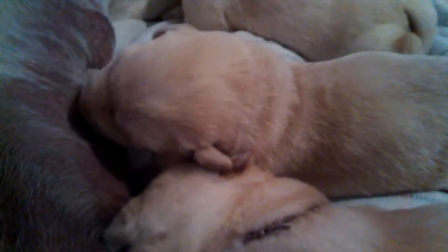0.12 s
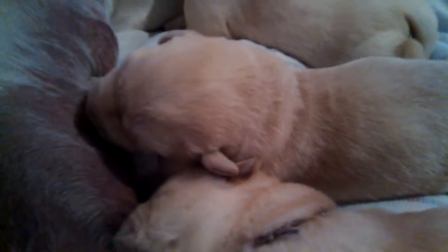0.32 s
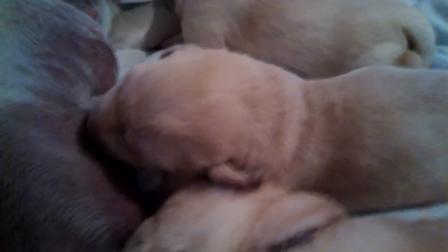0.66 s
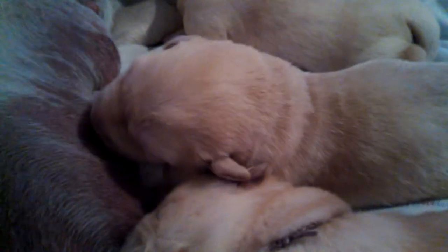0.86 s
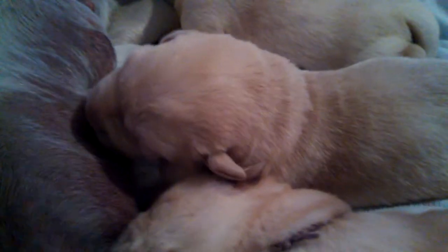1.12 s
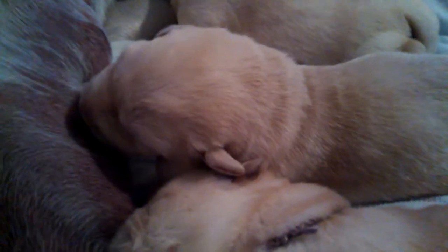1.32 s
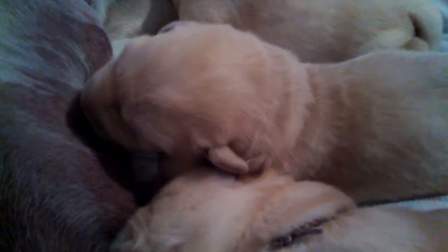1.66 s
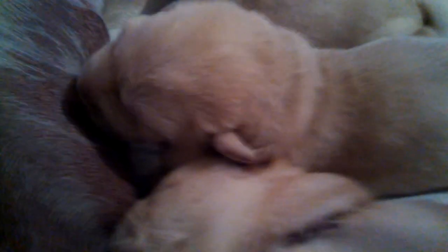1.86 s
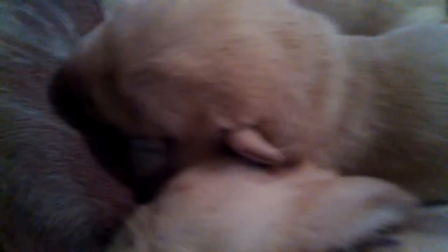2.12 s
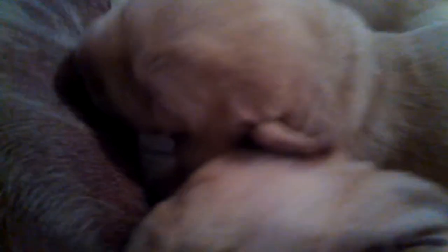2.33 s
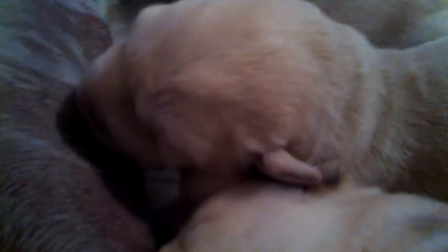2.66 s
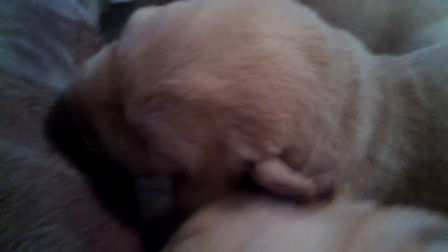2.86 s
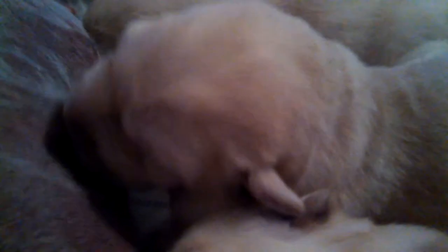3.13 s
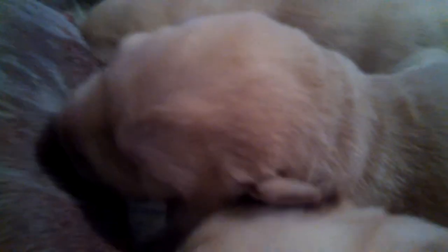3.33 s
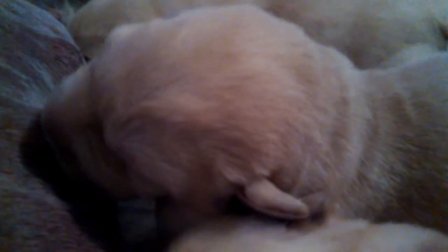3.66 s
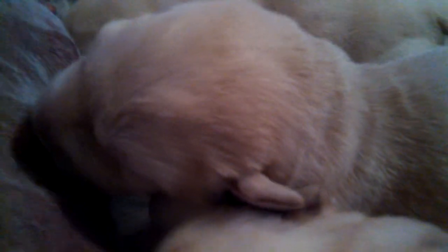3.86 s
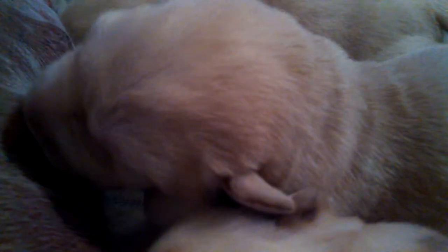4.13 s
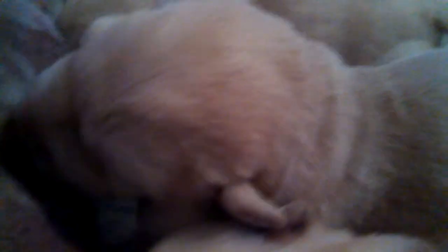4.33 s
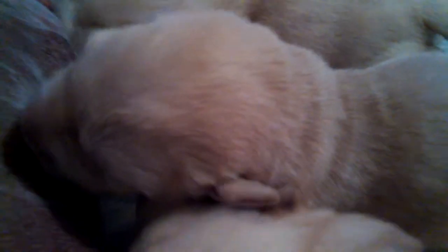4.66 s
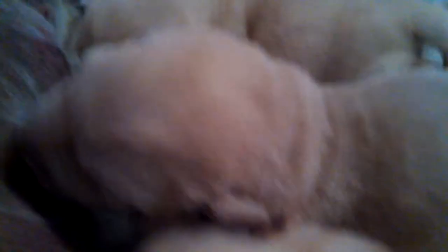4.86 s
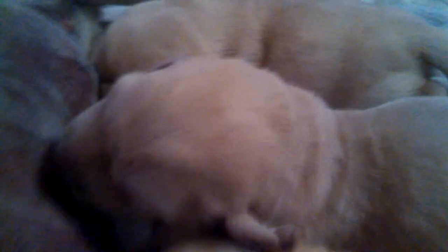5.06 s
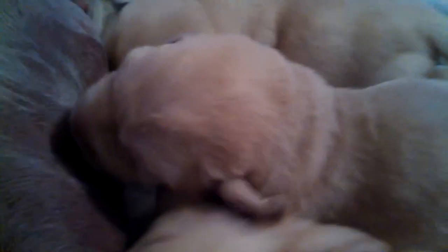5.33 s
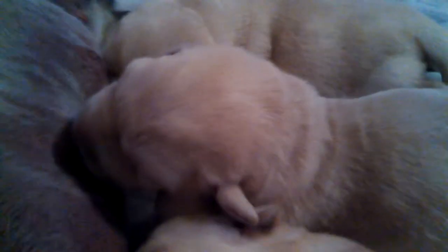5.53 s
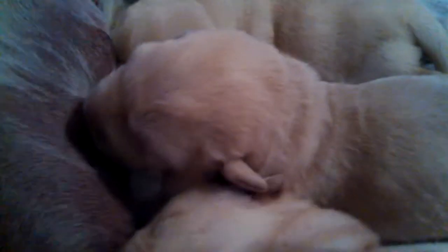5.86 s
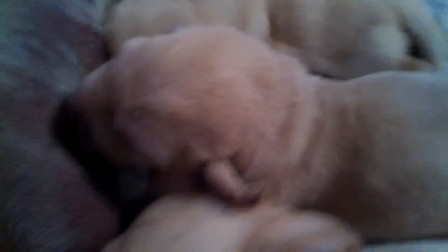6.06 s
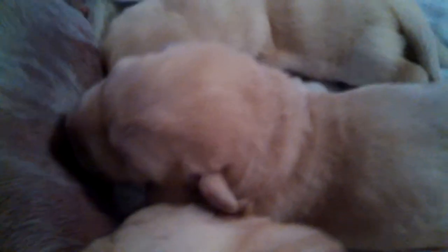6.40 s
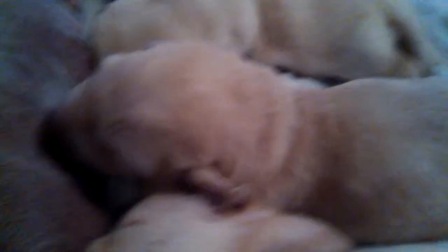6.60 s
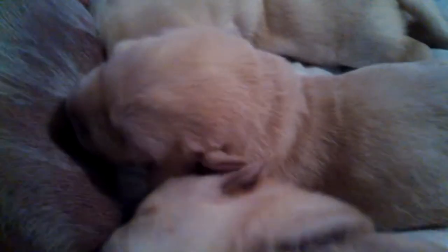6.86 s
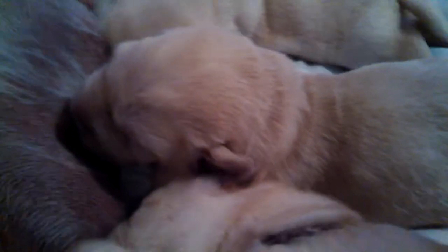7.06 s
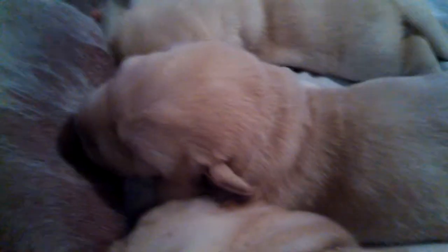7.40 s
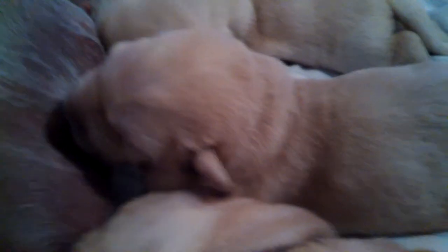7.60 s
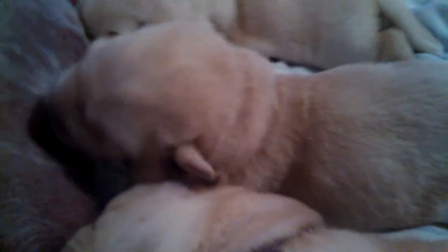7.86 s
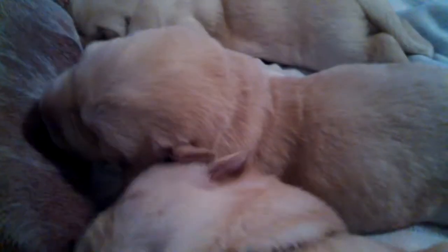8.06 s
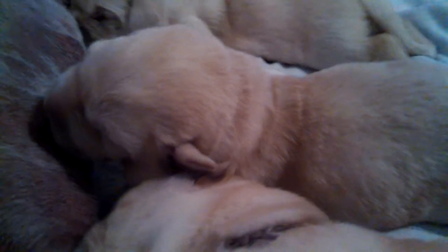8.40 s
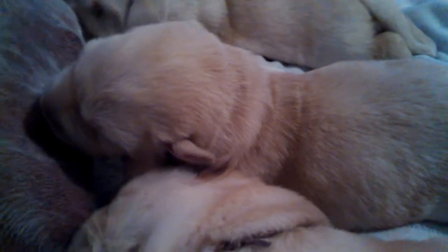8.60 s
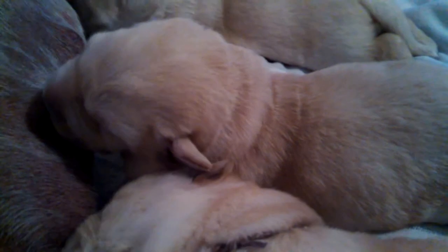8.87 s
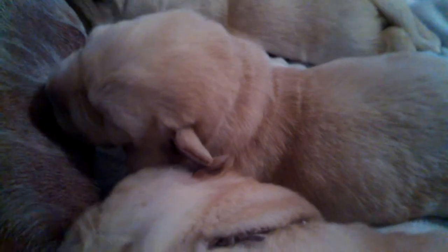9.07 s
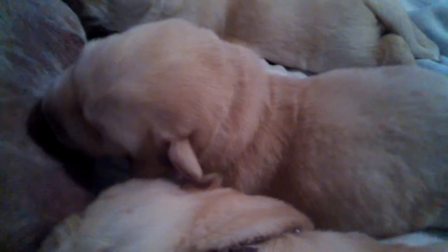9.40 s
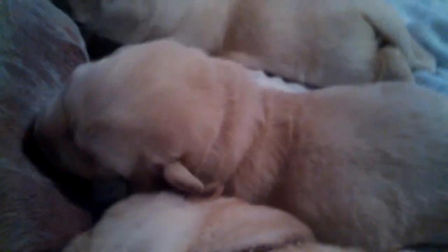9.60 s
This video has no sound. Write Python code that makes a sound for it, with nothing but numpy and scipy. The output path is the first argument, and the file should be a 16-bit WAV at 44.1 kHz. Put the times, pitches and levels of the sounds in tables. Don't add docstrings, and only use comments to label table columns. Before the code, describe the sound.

A tiny puppy whimpers right at a handheld microphone: a cry already under way, two long wavering ones, another swelling to a loud end, and a short raspy one. The second half is calmer, with nosy sniffing, small grunts, brief squeaky hums and sticky tongue clicks as it roots for milk. Faint rustling cloth and bassy handling bumps run throughout, indoors with almost no echo.

```python
import sys
import numpy as np
from scipy import signal
from scipy.fft import rfft, irfft, next_fast_len
from scipy.io import wavfile
from scipy.ndimage import uniform_filter1d

SR = 44100
rng = np.random.default_rng(int(sys.argv[2]) if len(sys.argv) > 2 else 0)


def persist_wave(psi):
    counts = np.round(np.clip(psi, -1, 1) * 32767).astype(np.int16)
    wavfile.write(sys.argv[1], SR, np.atleast_2d(counts).T)


def level_to_linear(level):
    exponent = np.asarray(level, float) / 20
    return 10 ** exponent


N = 428652
T = np.arange(N) / SR


def curve(tables):
    s, *columns = np.vstack(tables).T
    return [np.interp(T, s, c) for c in columns]


def colour(x, points, lag=0.):
    size = next_fast_len(N)
    hz = np.arange(size // 2 + 1) * SR / size + 1e-9
    point_hz, point_db = np.array(points).T
    gain = level_to_linear(np.interp(np.log(hz), np.log(point_hz), point_db))
    return irfft(rfft(x, size) * gain * np.exp(-2j * np.pi * hz * lag / SR), size)[:N]


def ring(x, modes):
    out = 0
    for k, (hz, width, db) in enumerate(modes):
        b, a = signal.iirpeak(hz, hz / width, SR)
        once = signal.lfilter(b, a, x)
        out = out + (-1) ** k * level_to_linear(db) * signal.lfilter(b, a, once)
    return out


def even(x):
    span = int(0.0077 * SR)
    power = uniform_filter1d(uniform_filter1d(x ** 2, span), span)
    return x / np.sqrt(power + 1e-12)


def wander(hold, smooth):
    held = np.repeat(rng.standard_normal(N // hold + 1), hold)
    return uniform_filter1d(held, smooth)[:N]


def noise(points, flicker_db=3.0, rate=25):
    x = colour(rng.standard_normal(N), points)
    hold = int(SR / rate)
    return x / x.std() * level_to_linear(flicker_db * wander(hold, hold))


def gate(start, end, rise_s, fall_s, t=T):
    return np.clip(np.minimum((t - start) / rise_s, (end - t) / fall_s), 0, 1)


def swells(rows, floor_db):
    t, out = T[::40], -200
    for s, db, rise_s, fall_s, *hold_s in rows:
        before = (s - t) / rise_s
        after = (t - s - sum(hold_s)) / fall_s
        out = np.maximum(out, db - 20 * np.maximum(np.maximum(before, after), 0))
    return np.maximum(np.interp(T, t, out), floor_db)


def own_and_shared(shared, own):
    return .85 * shared + .5 * own


# (time [s], stir [dB])
STIR = [(0, 0), (1.5, 1.5), (3.2, 1), (3.33, -8), (3.6, -9), (4.64, -4), (4.9, 3.5), (5.1, 9), (5.46, 7),
        (5.77, 3), (6.48, 4), (6.6, 0), (9.0, 0), (9.2, 3), (9.35, -1), (9.55, 5)]


def stirring():
    return curve([STIR])[0]


# (frequency [Hz], density [dB per Hz])
SHUFFLE = [(60, -32), (150, 3.5), (400, 0.5), (1000, -13.5), (2000, -19), (3000, -13), (5000, -34.5)]


def shuffle(stir_db):
    shared = noise(SHUFFLE)
    return np.array([level_to_linear(stir_db - 55.5) * own_and_shared(shared, noise(SHUFFLE)) for _ in range(2)])


# (frequency [Hz], density [dB per Hz])
THUMP = [(20, -20), (45, -10), (90, -5.5), (200, -13), (400, -45)]
# (peak time [s], peak level [dB], rise [s per 20 dB], fall [s per 20 dB])
RUMBLE = [
    (5.09, -57, .12, 3.0),
    (6.82, -55, .2, .09),
    (8.91, -56, .3, .1),
]


def rumble(stir_db):
    level_db = np.maximum(-54.5 + .6 * stir_db, swells(RUMBLE, -90) + 13.5)
    level_db = level_db - 4 * sum(gate(a, b, .3, .05) for a, b in BOUTS[2:4])
    shared = noise(THUMP, 1.6, 8)
    return np.array([level_to_linear(level_db) * own_and_shared(shared, noise(THUMP, 2.3, 3.1)) for _ in range(2)])


# (peak time [s], peak level [dB], rise [s per 20 dB], fall [s per 20 dB], hold [s])
SNIFFS = [(4.65, -50, .7, .085, 0), (4.95, -38.5, .06, 4.0, 0), (5.81, -46, .05, .1, .04),
          (5.93, -52, .06, .1, .03), (6.08, -44, .05, .08, .035), (6.335, -43.5, .04, .08, .05),
          (6.51, -41, .06, .05, .085), (6.885, -40, .04, .1, .07), (7.54, -51.5, .6, .15, 0),
          (7.75, -42.5, .09, .15, 0), (7.97, -50.5, .02, .07, 0), (8.07, -53.5, .13, .11, 0),
          (8.65, -58, .8, .11, 0), (9.02, -38.5, .1, .09, 0), (9.19, -54, .13, .3, 0),
          (9.47, -55, .09, .3, 0)]


def sniff_level():
    quiet_db, rooting_db, rooting_s, pant_end_s = -79, -68, 5.9, 5.54
    sniffs_db = swells(SNIFFS[:1] + SNIFFS[2:], np.where(T > rooting_s, rooting_db, quiet_db))
    pant_db = swells(SNIFFS[1:2], -90) - 500 * np.clip(T - pant_end_s, 0, 1)
    return np.maximum(sniffs_db, pant_db)


# (frequency [Hz], density [dB per Hz])
SNIFF = [(1000, -17), (2500, 2), (4200, 3), (6500, 5), (9000, 3.5), (11000, 4.5), (13000, 8.5), (15500, 1)]


def sniffs(level_db, flicker_db=3.0, rate=25):
    return level_to_linear(level_db) * noise(SNIFF, flicker_db, rate)


# (time [s], peak level [dB], swing frequency [Hz])
KNOCKS = [
    (6.824, -21.5, 140),
    (8.879, -40, 65),
    (8.902, -33, 60),
]


def knocks():
    out, t = np.zeros(N), T[:3000]
    for s, db, hz in KNOCKS:
        swing = np.cos(2 * np.pi * hz * t) * np.exp(-t * hz * 3.0)
        out[int(s * SR):][:3000] += level_to_linear(db) * swing * np.minimum(t * hz / 0.019, 1)
    return out


# (time [s], snap peak [dB], snap centre [Hz], thud level [dB], thud frequency [Hz])
CLICKS = [(3.3129, -35, 14960, -62, 429), (3.3254, -48, 4380, -67, 775), (3.3354, -24.5, 12300, -72, 336),
          (3.3408, -17.5, 12260, -63, 331), (5.7568, -28.5, 6700, -53, 210),
          (5.7828, -24.5, 6600, -45, 332), (5.9539, -30, 6470, -44, 269), (6.7775, -32, 9600, -40.5, 288),
          (6.8244, -34, 4650, -49, 198), (6.8758, -25.5, 7030, -58, 218), (6.9394, -31.5, 6820, -38.5, 584),
          (7.3354, -26.5, 12200, -50, 269), (7.4081, -43, 14640, -62, 134), (7.8474, -45, 14720, -53, 366),
          (7.9754, -21.5, 14900, -38.5, 470), (8.0394, -43, 3793, -55, 888), (8.0551, -22, 12320, -67, 264),
          (8.1094, -37, 3700, -51, 307), (8.1753, -55, 3960, -54, 221), (8.3489, -31, 6740, -48, 584),
          (8.9974, -24, 12620, -41, 587), (9.1376, -36, 10100, -40, 580)]


def clicks():
    out, t = np.zeros(N), T[:600]
    for s, db, hz, thud_db, thud_hz in CLICKS:
        grit = rng.standard_normal(600)
        snap = (np.cos(2 * np.pi * hz * t) + 0.38 * grit) * np.exp(-t / 0.00048)
        thud = np.sin(2 * np.pi * thud_hz * t) * np.exp(-t * thud_hz / 1.2)
        out[int(s * SR):][:600] += level_to_linear(db) * snap + level_to_linear(thud_db + 10.5) * thud
    return out


def folds(hz, pairing, rough, threes, fours, air=.4):
    phase = np.cumsum(hz) / SR
    cycle = np.arange(1, int(phase[-1]))
    at = np.interp(cycle, phase, np.arange(N))
    i = at.astype(int)
    timing, strength = rng.standard_normal((2, len(cycle)))
    drift = signal.lfilter([1], [1, -.6], timing * rough[i])
    beat = pairing[i] * (-1.) ** cycle
    beat = beat + threes[i] * np.cos(2 * np.pi * cycle / 3)
    beat = beat + fours[i] * np.cos(np.pi * (cycle + .5) / 2)
    at = np.clip(at + (.28 * drift + .14 * beat) * SR / hz[i], 8, N - 10)
    size = (1 + beat) * level_to_linear(6.0 * rough[i] * np.minimum(strength, 1))
    place = at.astype(int)[:, None] + np.arange(-7, 9)
    gap = place - at[:, None]
    shape = size[:, None] * np.sinc(gap) * np.cos(np.pi * gap / 16) ** 2
    pulses = np.bincount(place.ravel(), shape.ravel(), N)
    puff = signal.lfilter([.12], [1, -.88], pulses) * rng.standard_normal(N)
    return pulses, air * (.6 + 3.0 * rough) * puff


# (time [s], length [s], first fold rate [Hz], level [dB], cheek resonance [Hz])
GRUNTS = [
    (5.791, 0.04, 337, -32, 450),
    (6.048, 0.045, 300, -44, 347),
    (6.247, 0.03, 330, -36, 780),
    (6.301, .035, 300, -43, 298),
    (7.729, .018, 460, -37, 456.5),
    (9.086, 0.046, 235, -43, 750),
    (9.169, .035, 370, -32, 680),
]
# (time [s], length [s], first fold rate [Hz], level [dB], cheek resonance [Hz])
HUMS = [
    (6.428, .082, 215, -32, 440),
    (6.983, 0.038, 158, -37, 794),
    (7.972, .04, 449, -36, 484),
    (8.551, .045, 432, -33.5, 452),
    (8.962, 0.03, 490, -36, 750),
    (9.131, .012, 595, -41, 617),
    (9.201, .055, 400, -33, 413),
]
# (frequency [Hz], width [Hz], level [dB])
SHUT = [(1910, 660, -14), (6500, 920, -28.5), (9863, 2000, -22.5)]


def grunts():
    hz, none, out = np.full(N, 300.), np.zeros(N), np.zeros(N)
    for rows, glide in [(GRUNTS, .85), (HUMS, 1.07)]:
        for s, length, first_hz, _, _ in rows:
            on = slice(int((s - .004) * SR), int((s + length + .004) * SR))
            hz[on] = np.interp(T[on], [s, s + length], [first_hz, first_hz * glide])
    pulses, puff = folds(hz, none, np.full(N, .2), none, none, air=1.2)
    source = 6.2 * (pulses + puff) * np.sqrt(SR / hz)
    for s, length, _, db, cheek_hz in GRUNTS + HUMS:
        near = slice(int((s - .01) * SR), int((s + length + .05) * SR))
        envelope = gate(s - .003, s + length + 0.0036, 0.25 * length, 0.6 * length, T[near])
        burst = level_to_linear(db) * source[near] * envelope
        closing = np.clip(1.5 - 0.9 * (T[near] - s) / length, 0, 1)
        out[near] += ring(burst * closing, [(cheek_hz, 330, 2), (2.18 * cheek_hz, 800, -17)] + SHUT)
        out[near] += ring(burst * (1 - closing), [(min(cheek_hz, 470.), 170, 3)])
    return out


# (start [s], end [s])
BOUTS = [
    (-.1, .385),
    (.657, 1.455),
    (1.701, 3.278),
    (3.576, 4.625),
    (4.957, 5.455),
]
REGISTERS = {"clear": (.006, .012, 0, 0), "paired": (.7, .025, 0, 0), "husky": (.75, .07, 0, 0),
             "hoarse": (.7, .14, 0, .2), "fourfold": (.65, .06, 0, .4), "chaos": (.55, .4, 0, .25),
             "threefold": (0, .1, .8, 0), "growl": (.1, .42, .75, 0)}
# (time [s], first fold rate [Hz], last fold rate [Hz], arch [Hz], register [name])
FIRST_CRY = [(0, 960, 950, -10, "clear"), (.18, 950, 953, 0, "paired"), (.21, 756, 572, 0, "husky"),
             (.33, 651, 818, 0, "clear")]
SECOND_CRY = [(.66, 779, 810, 0, "chaos"), (.68, 810, 941, 0, "clear"), (.76, 720, 700, 0, "husky"),
              (.81, 700, 700, 0, "fourfold"), (.86, 700, 850, -10, "paired"), (.91, 850, 875, 12, "paired"),
              (1.012, 1190, 1095, -30, "clear"), (1.05, 1095, 1090, 0, "clear"),
              (1.08, 1090, 1140, 25, "clear"), (1.135, 790, 835, 10, "husky"), (1.17, 790, 750, 0, "chaos"),
              (1.24, 731, 766, -85, "husky"), (1.33, 740, 700, -30, "chaos"),
              (1.355, 750, 780, 10, "husky"), (1.39, 780, 790, 0, "hoarse"), (1.42, 862, 853, 0, "clear")]
THIRD_CRY = [(1.7, 800, 720, 0, "chaos"), (1.81, 699, 820, 0, "husky"), (1.845, 834, 833, 0, "clear"),
             (1.9, 752, 785, 0, "fourfold"), (1.945, 785, 729, 22, "paired"),
             (2.02, 729, 690, 100, "paired"), (2.14, 690, 660, 0, "fourfold"),
             (2.175, 660, 633, 0, "paired"), (2.205, 720, 660, 0, "chaos"), (2.29, 660, 660, 0, "hoarse"),
             (2.35, 665, 679, 25, "paired"), (2.45, 679, 764, 16, "paired"), (2.59, 764, 745, 12, "clear"),
             (2.63, 740, 658, -30, "paired"), (2.71, 660, 660, 0, "hoarse"), (2.73, 660, 658, 0, "paired"),
             (2.76, 658, 668, -8, "chaos"), (2.83, 670, 736, 17, "paired"), (3.04, 736, 724, 30, "clear"),
             (3.15, 724, 700, 0, "husky"), (3.185, 700, 660, 0, "chaos"), (3.225, 631, 815, 0, "clear")]
FOURTH_CRY = [(3.58, 720, 800, 0, "chaos"), (3.605, 780, 809, 0, "husky"), (3.625, 815, 866, 10, "clear"),
              (3.7, 725, 700, -10, "paired"), (3.76, 705, 712, 0, "husky"), (3.8, 712, 790, -15, "paired"),
              (3.895, 1006, 960, -45, "clear"), (3.95, 730, 756, 45, "husky"),
              (4.003, 930, 905, 0, "clear"), (4.075, 759, 750, 0, "hoarse"), (4.131, 960, 920, 0, "clear"),
              (4.15, 680, 760, 25, "husky"), (4.19, 760, 745, -12, "paired"), (4.265, 745, 860, 0, "husky"),
              (4.295, 895, 915, 0, "clear"), (4.43, 915, 760, -28, "clear"), (4.56, 685, 740, 25, "clear")]
FIFTH_CRY = [(4.955, 690, 740, 0, "chaos"), (5.0, 760, 810, 20, "growl"), (5.12, 800, 810, -25, "growl"),
             (5.225, 810, 815, -10, "threefold"), (5.28, 800, 790, 0, "chaos"),
             (5.32, 790, 690, 10, "chaos"), (5.378, 640, 900, -80, "clear")]


def notes():
    break_rough, break_s = .18, .012
    hz, ways = np.full(N, 750.), np.zeros((4, N))
    for cry, (_, end) in zip([FIRST_CRY, SECOND_CRY, THIRD_CRY, FOURTH_CRY, FIFTH_CRY], BOUTS):
        last = cry[0][1]
        stops = [row[0] for row in cry[1:]] + [end]
        for (s, first_hz, last_hz, arch_hz, register), stop in zip(cry, stops):
            on = slice(max(int(s * SR), 0), int(stop * SR))
            way = np.linspace(0, 1, on.stop - on.start)
            hz[on] = first_hz + (last_hz - first_hz) * way + arch_hz * np.sin(np.pi * way)
            ways[:, on] = np.array(REGISTERS[register])[:, None]
            if abs(np.log(first_hz / last)) > .08:
                start = max(on.start - int(break_s * SR / 2), 0)
                ways[1, start:][:int(break_s * SR)] = break_rough
            last = last_hz
    return uniform_filter1d(hz, size=350), uniform_filter1d(ways, size=400)


# (time [s], creak rate [Hz], depth [0-1])
CREAK = [
    (1.702, 50, 1),
    (1.74, 140, .95),
    (1.78, 170, .7),
    (1.81, 180, 0),
]


def creak():
    rate, depth = curve([CREAK])
    on = T > CREAK[0][0]
    phase = np.cumsum(rate * on) / SR % 1
    return 1 + depth * on * (1.9 * np.exp(-(phase / 0.4) ** 2) - 1)


# (peak time [s], peak level [dB], rise [s per 20 dB], fall [s per 20 dB])
PUFFS = [
    (.67, -55, .01, 5.0),
    (1.1, -45, .4, 2.0),
    (2.386, -43, .45, .09),
    (3.28, -48, 1.1, .01),
    (4.1, -42, .8, 3.0),
    (5.07, -33, .03, .6),
]


def breath_hiss():
    spectrum = [(9000, -15), (11500, -1.5), (13000, -2), (15500, -8.5)]
    return level_to_linear(swells(PUFFS, -70) - 2.0) * noise(spectrum, rate=14)


# (time [s], effort [dB], mouth opening [dB])
EFFORT = [
    [(0.0, -31.5, -2), (0.2, -31.5, -2), (0.332, -33.5, -2), (0.356, -30.5, -13), (0.385, -52, -6)],
    [(0.655, -36, 5), (0.705, -23, -24), (0.783, -37, -3), (0.92, -29.5, 3), (1.023, -31.5, -3),
     (1.14, -33, 1), (1.28, -33, -1), (1.37, -30, 1), (1.419, -29, -1), (1.46, -38, -22)],
    [(1.7, -37, -6), (1.74, -40, -4), (1.85, -29.5, -3), (1.911, -29.5, -5.5), (2.483, -29.5, 1),
     (2.511, -27, -2), (3.181, -28.5, -3), (3.255, -33, -13), (3.28, -68, -9)],
    [(3.575, -39, -1), (3.651, -32, -15.5), (3.767, -35, -5), (3.95, -31, 1), (4.26, -30.5, -5),
     (4.31, -33, 0), (4.44, -29.5, 1.5), (4.565, -23.5, -10), (4.63, -44, -18)],
    [(4.955, -33, -5), (5.02, -29, -7), (5.2, -30, -5), (5.36, -30, -2), (5.422, -26, -9), (5.455, -52, -6)],
]
# (time [s], jaw [dB], chest [dB], rounding [-1 to 1])
TONGUE = [(0, 0, 0, 0), (.2, 0, -3, .5), (.35, 0, -2, .3), (.76, -2, 0, .4), (.9, 1, -2, 0),
          (1.15, 0, -4, 0), (1.28, -3, -3, .9), (1.4, 1, -5, .7), (1.72, 0, -6, .4), (1.9, 1, -2, 0),
          (1.97, 2, -2, -.6), (2.1, 0, -2, -.5), (2.25, 0, 0, .2), (2.5, 0, -2, -.1), (2.65, -1, -4, 0),
          (2.8, -1, -2, .2), (2.95, -4, -4, -.1), (3.2, 0, 2, 0), (3.72, 0, 1, -.7), (3.82, 0, 1, -.3),
          (3.88, 0, 1, .2), (3.93, 0, 2, 0), (4.1, 1, 2, .2), (4.25, 2, 2, .4), (4.3, 0, 0, 0),
          (4.6, 0, 0, 0), (4.96, 1, -3, 0), (5.04, 6, 7, .7), (5.18, 6, 7, .5), (5.25, 4, 6, 0),
          (5.32, 3, 2, .2), (5.4, 3, 0, .6)]
# (frequency [Hz], width [Hz], level [dB])
THROAT = [(343, 300, -1), (750, 656, 4)]
JAW = [(1170, 500, 0)]
MOUTH = [(1573, 545, 48), (1820, 160, -1), (2250, 350, -25)]
NOSE = [(3820, 1650, -34), (6320, 1380, 3.5), (8960, 3050, 6)]
# (frequency [Hz], level [dB])
MUZZLE = [(60, -30), (170, 0), (2050, 0), (2400, -3), (3000, -7), (4000, -1.5), (4800, -9.5), (5600, 1),
          (6800, 0), (7800, -4.5), (8800, 0), (10500, 0), (11500, -4.5)]


def whine():
    hz, (pairing, rough, threes, fours) = notes()
    effort_db, mouth_db = curve(EFFORT)
    tongue_db, larynx_db, rounding = curve([TONGUE])
    strain = sum(np.interp(T - a, (.3, .65), [0, 1]) * (T < b) for a, b in BOUTS if b - a > 1.2)
    paired_db = -1 + tongue_db - 6 * strain
    clear_db = np.interp(hz, (670, 750, 890, 945), [-1, -26, -26, 7])
    jaw_db = uniform_filter1d(np.where(pairing + threes > .3, paired_db, clear_db), size=400)
    throat_db = effort_db - np.maximum(jaw_db, 0)
    mouth_db = mouth_db + np.maximum(jaw_db, 0)
    nose_db = -10.5 + .45 * mouth_db + np.interp(hz, (960, 1090), [0, 9])
    hz = hz * (1 + .012 * wander(900, 1500))
    pulses, puff = folds(hz, pairing, rough, threes, fours)
    flow = pulses + .06 * puff
    chest = level_to_linear(1.5 + larynx_db - 10 * strain) * ring(flow, THROAT[:1])
    voice = even(chest - ring(flow, THROAT[1:]))
    voice += level_to_linear(jaw_db - 4.5) * even(ring(pulses + .05 * puff, JAW))
    oral = pulses + .08 * puff
    lips = (1 - abs(rounding)) * even(ring(oral, MOUTH))
    lips += np.maximum(rounding, 0) * even(ring(oral, [(1420, 420, 0)]))
    lips += np.maximum(-rounding, 0) * even(ring(oral, [(1880, 420, 0)]))
    voice -= level_to_linear(mouth_db + 4.0) * even(lips)
    flutter_db = 2.65 * wander(1500, 1200)
    nasal = even(ring(pulses + .3 * puff, NOSE))
    voice = level_to_linear(throat_db + 1.0) * (voice + level_to_linear(nose_db + 4.0 + flutter_db) * nasal)
    breaths = sum(gate(a, b, 0.0016, 0.011) for a, b in BOUTS)
    return (colour(voice * creak(), MUZZLE) + breath_hiss()) * breaths


# (frequency [Hz], level [dB])
FAR_PORT = [(50, 36), (400, 0.5), (1000, -7), (2000, -5), (3000, -30), (5000, -41), (7000, -32.5),
            (10000, -33), (12000, -11), (16000, -17)]


def at_ports(near):
    lag_samples, vent_hz = 10.96, 134
    shaded = colour(near, FAR_PORT, lag_samples)
    far = signal.lfilter(*signal.butter(1, vent_hz, "high", fs=SR), shaded)
    tail = rng.standard_normal((2, 8000)) * level_to_linear(-60 * T[:8000] / 0.1 - 37)
    return np.array([near, far]) + signal.fftconvolve(near[None], tail)[:, :N]


def scene():
    stir_db, sniff_db = stirring(), sniff_level()
    near = whine() + grunts() + clicks() + sniffs(sniff_db - 0.5, 1.4, 40)
    ports = at_ports(near)
    ports[0] += knocks()
    ports += shuffle(stir_db) + rumble(stir_db)
    for port in ports:
        port += 0.4 * sniffs(sniff_db)
    return ports


def roll_off(x):
    return signal.sosfilt(signal.butter(12, 16890, fs=SR, output="sos"), x)


# (frequency [Hz], level [dB])
SUM_GAPS = [(2100, 1), (2450, -10.5), (3000, -4), (3400, 0), (4700, 0.5), (5100, -2.5), (5600, -3.5),
            (5800, -0.5), (7700, 0), (8200, -10), (8600, 0), (10800, -1), (11100, -5), (11600, -11),
            (12000, -3.5), (13000, -1), (13400, -12), (14300, 7), (14800, 4), (15500, 2), (15900, -40)]
DIFFERENCE_GAPS = [(3200, 2), (3600, -13), (4500, -7), (4900, 2.5), (11700, -2), (12000, -15),
                   (12900, -10.5), (13200, 0.5), (15300, 0), (15700, -40)]


def record(dry):
    cross_lag, balance_db = 16, -1.5
    left, right = dry - np.pad(dry[::-1], ((0, 0), (cross_lag, 0)))[:, :N]
    left, right = left * level_to_linear(balance_db / 2), right * level_to_linear(-balance_db / 2)
    mid = colour(left + right, SUM_GAPS) / 2
    side = colour(left - right, DIFFERENCE_GAPS) / 2
    return roll_off(np.array([mid + side, mid - side]))


dry = scene()
out = record(dry)
persist_wave(out)
```